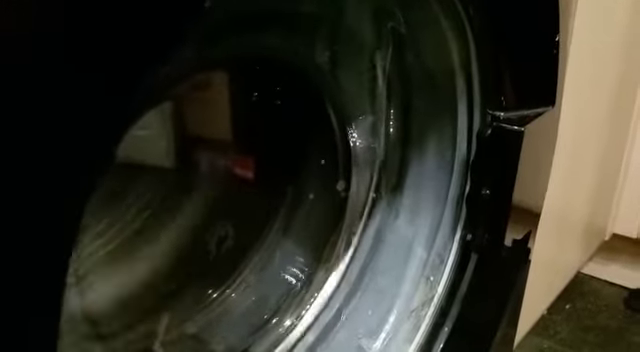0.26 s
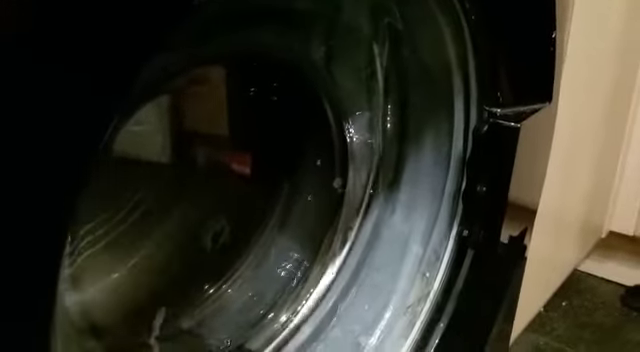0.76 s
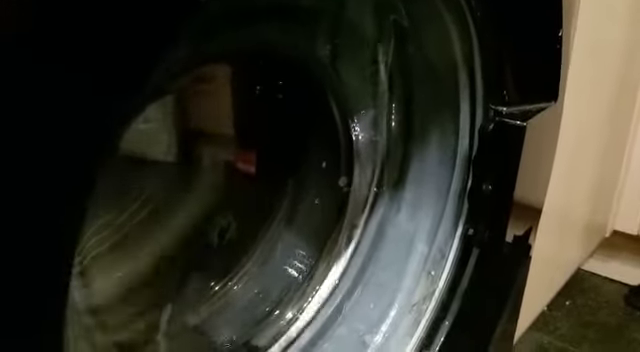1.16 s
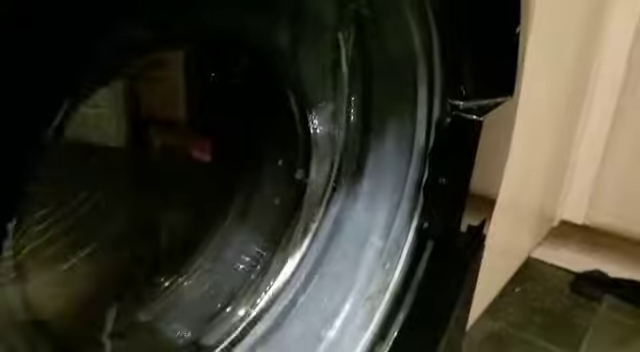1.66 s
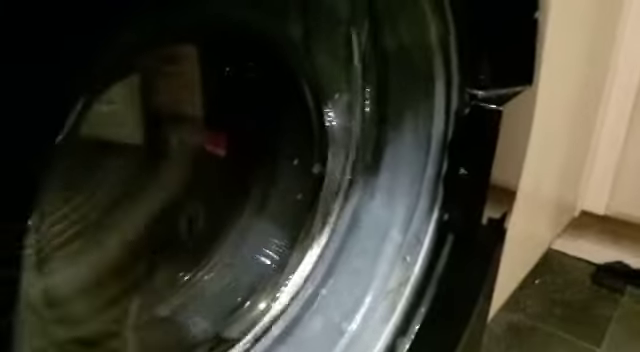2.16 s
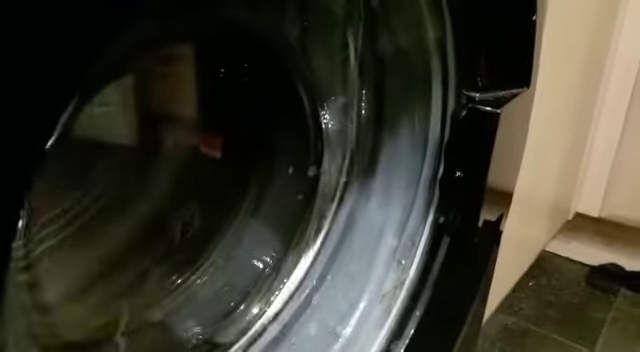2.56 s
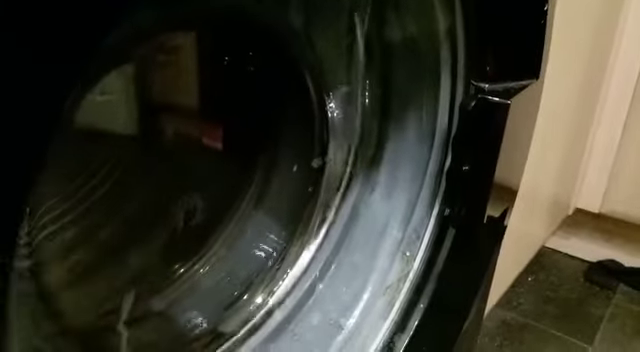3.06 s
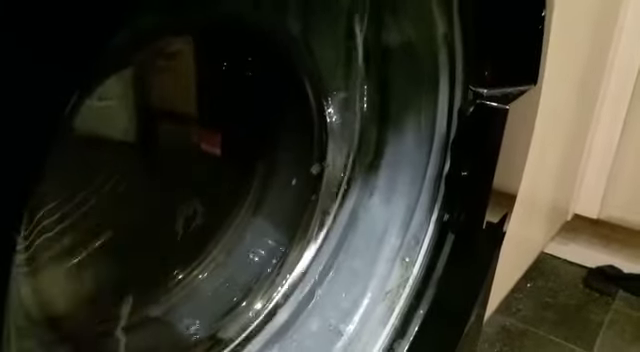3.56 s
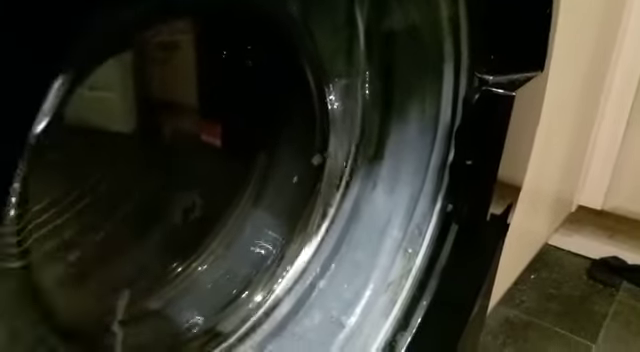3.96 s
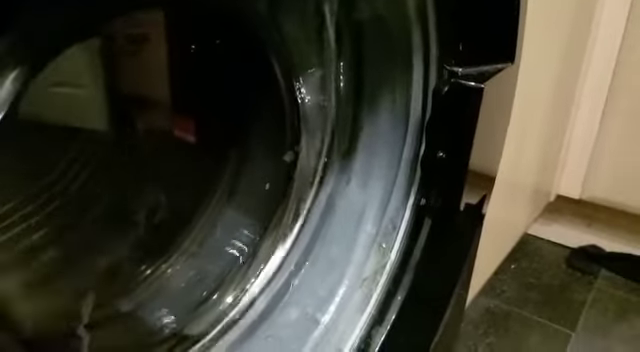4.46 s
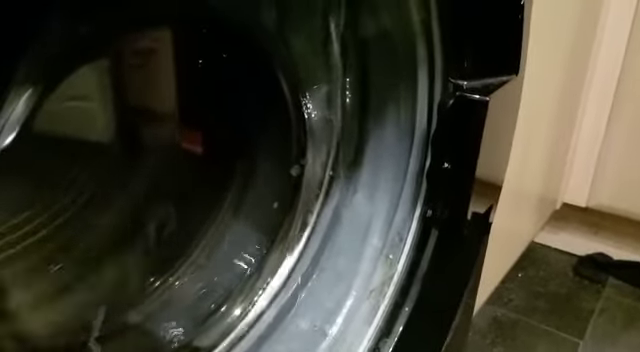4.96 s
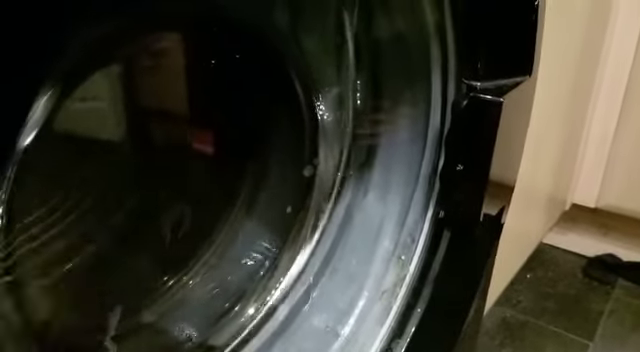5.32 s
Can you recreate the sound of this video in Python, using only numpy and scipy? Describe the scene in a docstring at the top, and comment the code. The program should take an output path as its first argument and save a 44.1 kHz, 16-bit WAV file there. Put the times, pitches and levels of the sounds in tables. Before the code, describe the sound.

Close-up of a spinning washer drum in a small hard room: deep pulsing hum, rushing air, high whine gliding downward, panels ringing unevenly.

```python
"""In a small hard room, a front-loading washing machine coasts down from a fast spin, heard close by.
The unbalanced drum shoves the cabinet to and fro once a turn: a row of low drum harmonics through resonances.
The belt-geared motor whines at its slot harmonics with shaft sidebands, gliding down, with brush chatter.
Air and bearings roar as shaped noise, panels ring as noise through narrow resonances, and the door panel
swells once a belt lap."""
import sys
import numpy as np
from scipy import signal
from scipy.fft import rfft, irfft
from scipy.io import wavfile
from scipy.ndimage import uniform_filter1d

SR = 44100
rng = np.random.default_rng(int(sys.argv[2]) if len(sys.argv) > 2 else 0)


def transcribe(signal):
    """Save signal, clipped to [-1, 1], as a 16-bit WAV file at the path in sys.argv[1]."""
    frames = np.atleast_2d(signal).T
    limited = np.clip(frames, -1, 1)
    pcm = np.round(limited * 32767).astype(np.int16)
    wavfile.write(sys.argv[1], SR, pcm)


N = 246512
T = np.arange(N) / SR  # time in s
HZ = np.fft.rfftfreq(N, 1 / SR)  # frequency of each bin of a whole-length spectrum

# how much louder the left side is than the right, by pitch: f/Hz, left over right/dB
LEAN_BY_PITCH = [(60, -1.5), (130, 2), (290, 0), (640, 4.5), (1410, 2), (3100, 0.5), (6820, -5),
                 (15000, 10)]
LAG_S = .0003  # the cabinet's sound reaches the right side this much later
LAG_RADIANS = 2 * np.pi * HZ * LAG_S

# the coasting motor: pitch of its slot tone, falling ever more gently
START_HZ, FALL_HZ_PER_S, EASE_HZ_PER_S2 = 3024.76, 99.345, 1.0282
SLOTS = 18  # slot-tone cycles per motor turn
BELT_RATIO = 12.205  # motor turns per drum turn
LAPS_PER_TURN, FIRST_LAP = .7449, .54  # belt laps per drum turn, part of a lap until the first knock
SLOT_HZ = START_HZ - FALL_HZ_PER_S * T + EASE_HZ_PER_S2 * T * T
OCTAVES = np.log2(SLOT_HZ / SLOT_HZ.mean())  # speed above its average
# angles in radians
SHAFT = 2 * np.pi * np.cumsum(SLOT_HZ) / SR / SLOTS
DRUM = SHAFT / BELT_RATIO
LAP = LAPS_PER_TURN * DRUM - 2 * np.pi * FIRST_LAP


def gain_of(db):
    """Turn decibels into a factor."""
    return 10 ** (np.asarray(db) / 20)


def evened(x):
    """Scale to rms 1."""
    return x / np.sqrt(np.mean(x ** 2) + 1e-20)


def read(points, hz):
    """Read a table at any frequency, with straight lines over log frequency."""
    f, value = np.transpose(points)
    return np.interp(np.log(hz + 1), np.log(f + 1), value)


def follow(rows, column=1):
    """Read one column of a table over time."""
    rows = np.array(rows)
    return np.interp(T, rows[:, 0], rows[:, column])


def filtered(x, response):
    """Pass a sound through a frequency response."""
    return irfft(rfft(x) * response, N)


def mode(hz, width_hz):
    """Response of one resonance, 1 at its centre."""
    return 1j * width_hz * HZ / (hz ** 2 - HZ ** 2 + 1j * width_hz * HZ)


def slow(rate_hz):
    """Slow random wandering of rms 1, fading out above the given rate."""
    size = N // 64  # one value per 64 samples is enough
    hz = np.fft.rfftfreq(size, 64 / SR)
    spectrum = rfft(rng.standard_normal(size)) * np.exp(-(hz / rate_hz) ** 2)
    return np.interp(T, T[::64][:size], evened(irfft(spectrum, size)))


def ports(x, lead):
    """One near source at two microphone ports: leaning by pitch, the left leading by some radians."""
    half = np.sqrt(gain_of(read(LEAN_BY_PITCH, HZ))) * np.exp(.5j * lead)
    return filtered(x, np.array([half, 1 / half]))


def room(x, t60):
    """Echoes as sparse taps of random sign, dying by 60 dB in t60 seconds, other taps for each side."""
    size = SR // 2
    signs = rng.choice([-1., 1.], (2, size))
    present = rng.random((2, size)) < .05
    taps = signs * present * gain_of(-60 * T[:size] / t60)
    taps /= np.linalg.norm(taps, axis=1, keepdims=True)
    running = np.pad(x, (size, 0), "reflect")  # the machine was already sounding
    return signal.fftconvolve(running[None], taps, axes=1)[:, size:size + N]


def causal(gain):
    """The minimum-phase response with this gain: it rings only after a push, as soon as it can."""
    cepstrum = irfft(np.log(gain + 1e-6), N)
    cepstrum[1:N // 2] *= 2
    cepstrum[N // 2 + 1:] = 0
    return np.exp(rfft(cepstrum))


def shoves():
    """A push and half a turn later a pull favour the odd drum orders; the cabinet modes colour them."""
    # cabinet and floor resonances under the shoves: f/Hz, width/Hz, level/dB
    cabinet = [(70.6, 8, -33), (93.1, 2.9, -30.5), (107.4, 3.8, -25), (117.2, 10.5, -27), (134.7, 6.4, -28),
               (154.8, 13, -33.5), (177.8, 6.2, -29.5), (202, 2.8, -35), (224.3, 7.24, -27),
               (270, 10.5, -43), (262.3, 5.6, -43), (303.7, 3.1, -44.5), (331.4, 4, -67),
               (362.6, 4.9, -42.5), (360, 2.7, -69)]
    # strength of the even drum orders against the odd ones: f/Hz, level/dB
    unevenness = [(50, -24), (75, -14), (140, -17), (170, -7), (200, -6), (225, -13), (270, -4), (400, -5)]
    first_shove = .44  # part of a drum turn already done at the start
    force_db_per_octave = 10.5  # the unbalance force grows with drum speed
    bounce_s, bounce_share = .0105, .7  # the bass bounces between close walls, smearing each shove

    angle = DRUM + 2 * np.pi * first_shove + 0.005 * slow(5.7)
    even = sum(np.sin(k * angle) for k in range(4, 32, 2))
    odd = sum(np.cos(k * angle) for k in range(5, 32, 2))
    odd *= gain_of(force_db_per_octave * OCTAVES) * gain_of(.5 * slow(1.7))
    even *= gain_of(3.7 * slow(0.54))
    force = rfft(odd) + gain_of(read(unevenness, HZ)) * rfft(even)

    # an all-pass: it spreads the sound in time and leaves each pitch as loud
    echo = np.exp(-2j * np.pi * HZ * bounce_s)
    walls = (echo - bounce_share) / (1 - bounce_share * echo)
    power = sum(abs(gain_of(db) * mode(hz, width)) ** 2 for hz, width, db in cabinet)
    shaken = irfft(force * causal(np.sqrt(power)) * walls, N)
    return ports(np.sqrt(2) * shaken, LAG_RADIANS)


def line_db(order, db):
    """Level of one whine line, with its own swells as it glides down past certain pitches."""
    # each line's own rises in level: shaft order, centre f/Hz, width/Hz, lift/dB
    lifts = [ (18, 3005, 46, 14.5), (18, 2935, 15, 12), (18, 2783, 9.7, 10), (18, 2690, 27, 15),
             (18, 2525, 78, 11), (35, 5820, 80, 12), (35, 5635, 72, 18.5), (36, 6030, 53, 12),
             (36, 5945, 32, 7), (36, 5845, 66, 10.5), (36, 5605, 29, 7.5), (36, 5540, 30, 5),
             (36, 5490, 26, 7), (36, 5405, 37, 7.5), (36, 5340, 29, 7.5), (36, 4600, 34, 6.5),
             (36, 5020, 44, 9), (54, 8450, 99, 5), (54, 8060, 220, 10.5), (54, 7570, 130, 8),
             (72, 10670, 650, 5)]
    hz = SLOT_HZ * round(order) / SLOTS
    for lifted_order, centre_hz, width_hz, lift_db in lifts:
        if round(lifted_order) == round(order):
            db = db + lift_db * np.exp(-((hz - centre_hz) / width_hz) ** 2)
    return db


def brush_chatter(angle):
    """Brush chatter: one random waveform that repeats every shaft turn, strongest near the slot harmonics."""
    # loudness of the chatter's lines: shaft order, rms level of a line/dB
    chatter_levels = [(12, -59), (19, -64), (24, -64.5), (30, -65), (33, -58.5), (38, -57.5), (41, -65.5),
                      (50, -62.5), (54, -58.5), (58, -72), (68, -69.5), (72, -53.5), (76, -70.5), (86, -67),
                      (90, -68.5), (96, -71)]
    orders = np.arange(12, 97)
    levels = gain_of(np.interp(orders, *np.transpose(chatter_levels)))
    one_turn = np.zeros(2049, complex)
    one_turn[orders] = levels * np.exp(2j * np.pi * rng.random(len(orders)))
    waveform = 2048 * irfft(one_turn)
    turn_part = angle / (2 * np.pi) % 1
    return np.sqrt(2) * np.interp(turn_part, np.linspace(0, 1, 4096), waveform)


def whine():
    """Fluttering lines locked to the shaft angle, which the drum's unbalance rocks once a turn."""
    # lines of the motor whine, before their swells: shaft order (rounded in use), level/dB, flutter/dB
    whine_lines = [(18, -62, 1), (35, -58, 3.5), (36, -47.5, 3.5), (37, -55.5, 6.5), (54, -61.5, 2),
                   (72, -55, 4), (90, -64, 3), (106.8, -56.5, 2)]
    lap_flutter_db, turn_flutter_db = 0.6, 2  # the whine throbs with belt and drum

    angle = SHAFT + .025 * np.sin(DRUM + 2.05) + .013 * slow(25)
    lines = np.zeros(N)
    for order, db, flutter_db in whine_lines:
        level = gain_of(line_db(order, db) + flutter_db * slow(22.6))
        lines += level * np.cos(round(order) * angle)
    lines *= gain_of(lap_flutter_db * np.cos(LAP) + turn_flutter_db * np.cos(DRUM - 1.1))
    lines *= np.sqrt(2)
    direct = gain_of(-2.5) * ports(lines, np.pi / 2)
    return direct + room(gain_of(-4.5) * lines + brush_chatter(angle), t60=0.69)


def roar():
    """Air and bearing noise: random short-time spectra with drifting patches, partly alike left and right."""
    # colour of the roar: f/Hz, relative level per Hz/dB
    colour = [(10, -37), (42, -35), (70, -22), (115, -10), (200, -16), (270, -16), (330, -21), (410, -21),
              (900, -21), (1500, -31), (2100, -35), (3000, -40), (7800, -47), (9300, -58), (11000, -55),
              (15500, -64)]
    # how alike left and right are by pitch: f/Hz, likeness (1 is the same, 0 unrelated)
    likeness = [(60, 0.7), (150, 1), (380, 0.51), (950, 0.13), (2380, 0.26), (5980, -0.07), (15000, 0.038)]
    level_db, drift_db_per_s = -30.5, -0.01

    frames, hz = N // 256 + 5, np.fft.rfftfreq(1024, 1 / SR)
    a, b, c, d, patches = rng.standard_normal((frames, 513, 5)).T
    smooth = uniform_filter1d(patches, 10, 0)  # over pitch
    patches = evened(uniform_filter1d(smooth, 8, 1))  # over time

    same = np.clip(read(likeness, hz), -1, 1)[:, None]
    lag = np.exp(-2j * np.pi * hz * LAG_S)[:, None]
    left = a + 1j * b
    right = same * left * lag + np.sqrt(1 - same ** 2) * (c + 1j * d)
    lean = np.sqrt(gain_of(read(LEAN_BY_PITCH, hz)))[:, None]

    # faster air hisses brighter
    speed = np.interp(np.arange(frames) * 256 / SR, T, SLOT_HZ)
    tilt_db = 12.5 * np.log2(1 + np.minimum(hz, 4000.) / 1000.0)[:, None]
    brightness_db = tilt_db * np.log(speed / speed.mean())

    spectra = np.array([left * lean, right / lean]) * gain_of(1.28 * patches + brightness_db)
    noise = signal.istft(spectra, nperseg=1024, noverlap=768)[1][:, 512:N + 512]
    noise = evened(filtered(noise, gain_of(read(colour, HZ))))
    throb_db = 0.19 * np.cos(DRUM - 2.1) + 0.5 * slow(22)
    return noise * gain_of(level_db + drift_db_per_s * T + throb_db)


def ring(hz, width_hz):
    """Noise through one narrow resonance twice, at rms 1."""
    return evened(filtered(rng.standard_normal(N), mode(hz, width_hz) ** 2))


def ringing_panels():
    """Panels that the roar keeps ringing, each wandering in level, louder at higher speed."""
    # panel resonances: f/Hz, width/Hz, relative level/dB
    panel_modes = [(267.9, 13.6, -48.5), (356.3, 9.9, -57), (450, 7.2, -54), (509, 10, -56), (633, 16, -57),
                   (716, 13, -51), (930.4, 39, -51.5), (990, 48, -48), (1444, 16, -53), (1839, 74, -57)]
    rest = sum(gain_of(db + 1.5 * slow(2.2)) * ring(hz, width) for hz, width, db in panel_modes)
    return rest * gain_of(2.5 + 17 * OCTAVES)  # 17 dB per octave of speed


def door_panel():
    """The door panel rings on and swells once a belt lap: one unsteady tone and noisy resonances."""
    # door resonances, the first sounding as the tone: f/Hz, width/Hz, relative level/dB
    door_modes = [(753, 22, 0.5), (770.7, 25, -4), (807.3, 36, -4.5), (719.6, 43, -7.5)]
    # the door's ringing over time: t/s, relative level/dB, dip between knocks/dB
    door_course = [(0, -33, 15), (.45, -33, 4), (.75, -33, 0), (1.1, -38, 2), (1.7, -32.5, 12),
                   (2.1, -33, 16), (2.3, -29.5, 12), (2.75, -29, 6), (3.2, -34, -1.5), (3.4, -32.5, 10),
                   (3.9, -26, 14), (4.45, -27.5, 20), (4.8, -28.5, 14), (5.0, -38, 6), (5.3, -25.5, 22),
                   (5.59, -31, 28)]
    third_lap_db, uneven_lap_db = 1.5, 1.5  # every third knock is harder; the rest vary

    (hz, width, db), *upper = door_modes
    tone_hz = hz + 0.398 * width * slow(12.22)
    door = gain_of(db) * np.sqrt(2) * np.sin(2 * np.pi * np.cumsum(tone_hz) / SR)
    door += sum(gain_of(db) * ring(hz, width) for hz, width, db in upper)
    knocks_db = -follow(door_course, column=2) * np.sin(LAP / 2) ** 2
    knocks_db += third_lap_db * np.cos(LAP / 3) + uneven_lap_db * slow(5.4)
    return door * gain_of(follow(door_course) - 4.5 + knocks_db)


def panels():
    """All panels, heard directly and through the room's echoes."""
    ringing = ringing_panels() + door_panel()
    return ports(ringing, LAG_RADIANS) + gain_of(-2.0) * room(ringing, t60=0.21)


def scene():
    """All the sources of the machine together."""
    return shoves() + whine() + roar() + panels()


def record(dry):
    """The band limit of the recorder: a steep low-pass."""
    edge_hz = 15680
    low_pass = signal.firwin(2047, edge_hz, window=("kaiser", 11), fs=SR)
    return signal.oaconvolve(dry, low_pass[None], "same")


dry = scene()
out = record(dry)
transcribe(out)
```